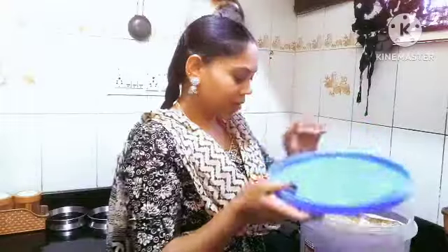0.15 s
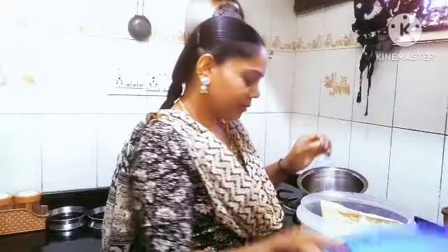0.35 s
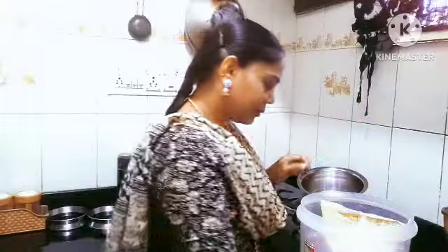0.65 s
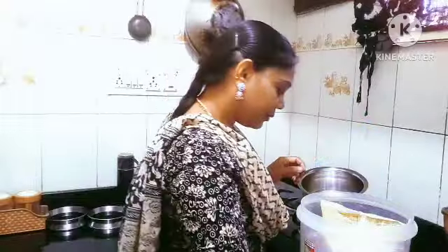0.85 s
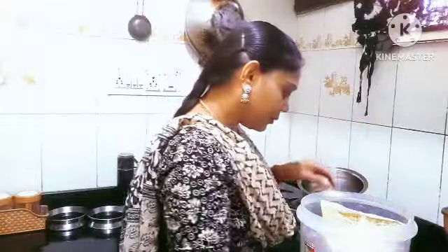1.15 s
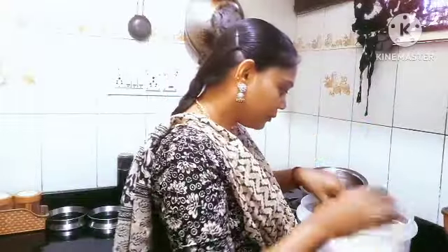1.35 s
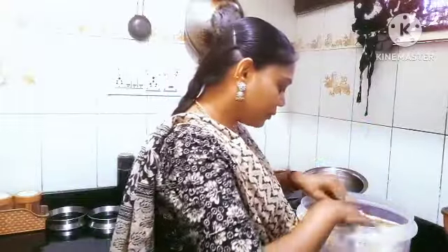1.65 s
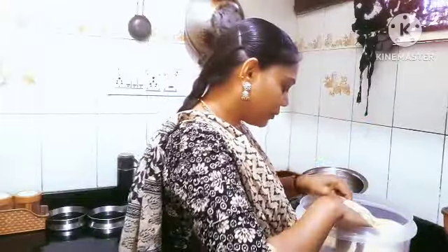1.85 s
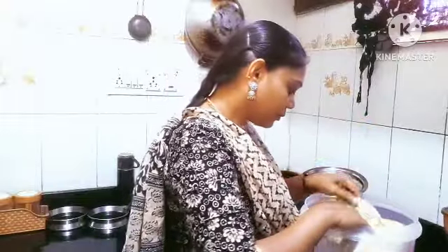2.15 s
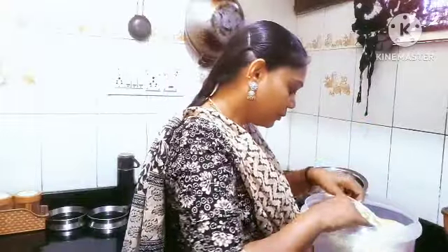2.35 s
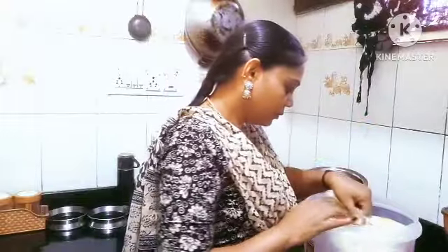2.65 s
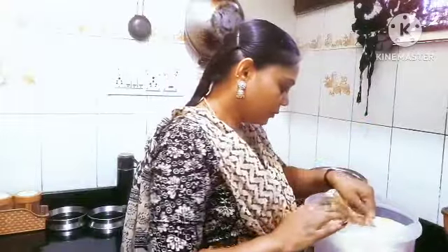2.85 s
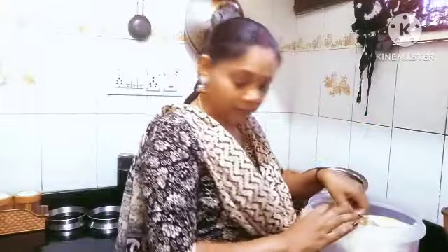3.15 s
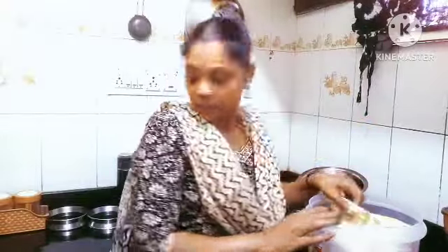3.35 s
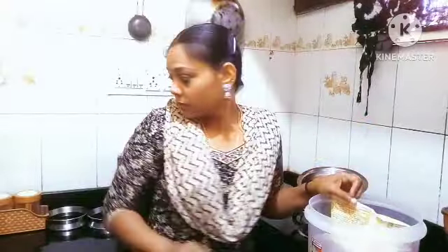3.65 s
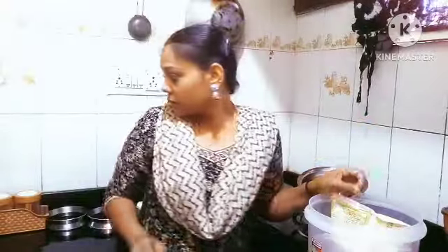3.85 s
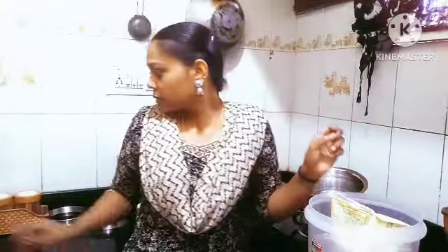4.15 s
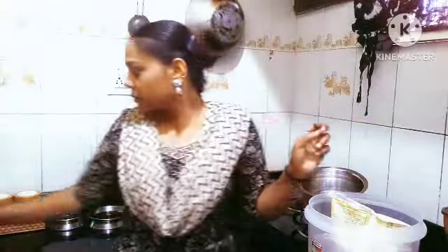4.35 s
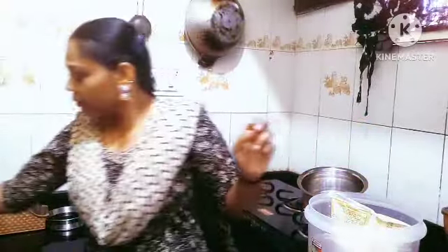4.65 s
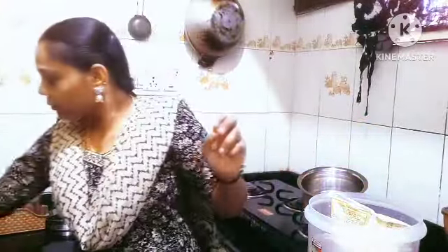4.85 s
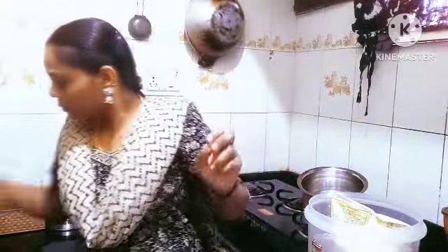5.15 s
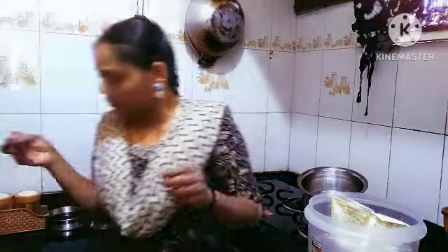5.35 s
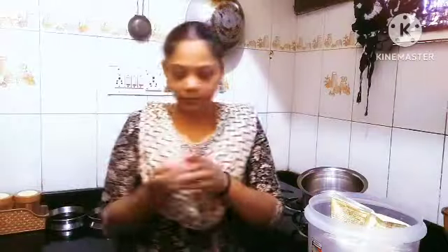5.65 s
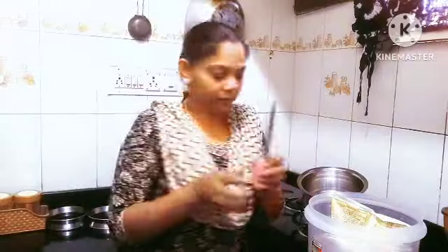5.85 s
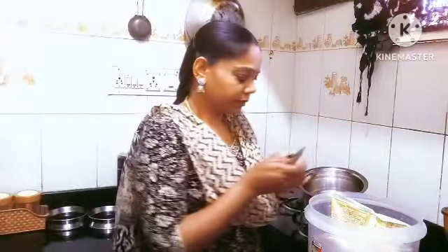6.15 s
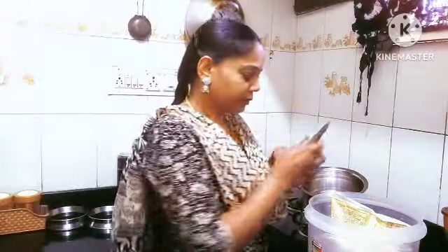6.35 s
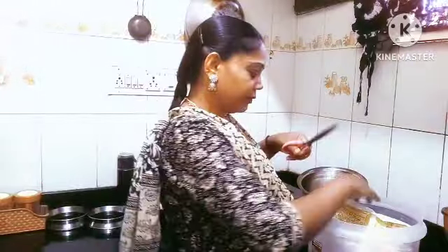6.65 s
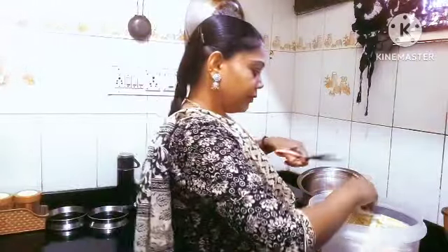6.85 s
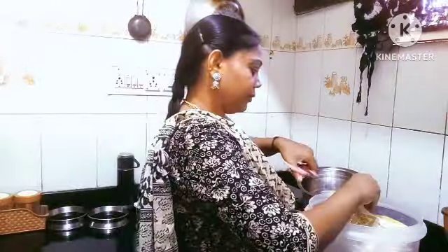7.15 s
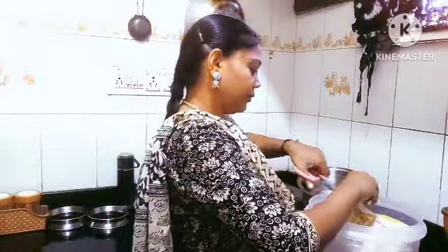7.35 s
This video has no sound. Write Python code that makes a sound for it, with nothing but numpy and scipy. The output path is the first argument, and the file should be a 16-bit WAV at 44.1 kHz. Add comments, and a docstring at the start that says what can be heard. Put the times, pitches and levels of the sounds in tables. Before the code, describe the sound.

Dull tub bump, ringing bowl knocks, busy crackling of a plastic bag, a quiet gap, a knife's scrape and clatter, then more bag rustling over faint hum.

```python
"""Getting flour ready

In a small tiled kitchen a lid is put aside and a steel bowl is set down on the stone counter; hands dig at
a plastic flour bag in a plastic tub, a knife is picked up and the bag is handled again.
Knocks and snaps are short noise bursts, and hard things add dying tones. Rubbing is made of many tiny slips.
Faint pings sound later; a wavering mains hum, a low murmur of air and brushing clothes lie underneath.
"""
import sys
import numpy as np
from scipy import signal
from scipy.fft import rfft, irfft, next_fast_len
from scipy.io import wavfile

SR = 44100
rng = np.random.default_rng(int(sys.argv[2]) if len(sys.argv) > 2 else 0)


def digitize_waveform(pressure):
    """Quantize a signal to 16-bit integers and store it at the path in sys.argv[1].

    Rows of a 2-D input are taken as channels; values are limited to [-1, 1].
    """
    field = np.atleast_2d(pressure).T
    bounded = np.clip(field, -1, 1)
    quanta = np.round(bounded * 32767).astype(np.int16)
    wavfile.write(sys.argv[1], SR, quanta)


N = 331632
TIME = np.arange(N) / SR
SHORT_TIME = TIME[:SR // 2]   # the half second given to each knock or echo

# Levels in the tables are relative: each sound is scaled again where it is used.
# Room air: [f/Hz, level/dB per Hz]
AIR_COLOUR = [(15, -58.5), (25, -14), (92, -0.5), (170, -6), (200, -16.5), (229, -10.5), (309, -14),
              (354, -20), (451, -20.5), (796, -22), (1040, -22), (4250, -49), (7110, -60), (8140, -55),
              (16000, -41)]
# Steady hum tones: [f/Hz, level/dB, pitch waver as a share of f]
HUM_TONES = [(94.6, -65, 0.014), (201.8, -61.5, 0.0027), (300, -88.5, 0.031), (2144, -83, 0.044)]
# Sleeves and clothes brushing as the arms move: [t/s, length/s, level/dB]
CLOTH_BRUSHES = [(0.195, 0.062, -61), (0.42, 0.14, -78.5), (4.1, 0.022, -71.5), (4.55, 0.047, -77),
                 (5.53, .015, -78), (5.85, 0.12, -75), (6.15, .15, -76), (6.55, 0.054, -76.5)]

# The tub being bumped, dull on its wall and thin on its rim: [t/s, level/dB, low cut f/Hz, high cut f/Hz]
TUB_KNOCKS = [(0.163, -39.5, 129, 9000), (0.224, -49, 150, 600), (0.235, -44, 453, 7000),
              (1.400, -53.5, 179, 250), (1.512, -42.5, 260, 600), (2.355, -23, 89.4, 109),
              (2.397, -37.5, 60, 150), (3.138, -61, 804, 1200), (3.238, -50, 300, 2010),
              (3.816, -40.5, 283, 1410), (3.893, -47.5, 870, 1600), (7.04, -42, 220, 300),
              (7.176, -62, 390, 1300), (7.369, -32, 590, 254), (7.371, -32.5, 69.4, 78.6),
              (7.395, -37.5, 600, 300), (7.48, -44, 217, 700)]
# Noise of a contact with the tub: [f/Hz, level/dB per Hz]
TUB_CONTACT_COLOUR = [(20, -65), (50, -11), (90, -14.5), (300, 12), (470, -14.5), (750, -4), (1200, -10.5),
                      (2500, -17.5), (5000, -23.5), (8500, -36), (11500, -23.5), (16000, -31.5)]
# Tones of the tub: [f/Hz, level/dB, time to fall 60 dB/s]
TUB_TONES = [(124, -10, .17), (275, -3, .1), (300, 0, .15), (565, -15, .14), (614, -10, .15),
             (673, -11, .18), (72, -15, .2), (870, -7, .15), (946, -6, .15)]

# The bowl landing and rocking on the counter: [t/s, level/dB, low cut f/Hz, high cut f/Hz]
BOWL_KNOCKS = [(0.9055, -36, 4140, 3900), (0.906, -30, 60, 7000), (0.921, -35, 910, 2500),
               (0.944, -35, 49.8, 2500), (0.966, -36, 60, 3480), (1.057, -31.5, 50, 2300),
               (1.090, -32, 400, 7050), (1.098, -28.5, 350, 400), (1.104, -36.5, 60, 1200)]
# Noise of a contact with the bowl: [f/Hz, level/dB per Hz]
BOWL_CONTACT_COLOUR = [(25, -28), (70, 2), (175, -13.5), (313, -7), (483, -13.5), (746, -2), (1180, -1),
                       (1660, -14), (1950, -11), (2750, -18), (3400, -23.5), (4300, -25.5), (6000, -30.5),
                       (8500, -41), (12000, -30.5), (16000, -33.5)]
# Tones of the bowl: [f/Hz, level/dB, time to fall 60 dB/s]
BOWL_TONES = [(733, 0, .24), (780, -1, .2), (864, -5, .24), (912, -4, .24), (318, -18, .3), (1152, -8, .26),
              (1184, -8, .2), (1291, -11, .24), (1395, -12, .24), (1950, -16, .26), (2418, -21, .22),
              (3214, -22, .18), (4250, -22, .1)]

# Hand strokes on the bag: [t/s, length/s, scrape level/dB, crinkle against scrape/dB, tub boom against scrape/dB]
BAG_STROKES = [(1.52, 0.083, -46, -8, -14), (1.626, 0.047, -36, -3.5, -4.5), (1.819, 0.02, -48, -3.5, 3),
               (1.949, 0.051, -38.5, -5.5, -4.5), (1.995, 0.092, -42, -16.5, -2),
               (2.299, 0.11, -47.5, -10.5, -10), (2.474, 0.017, -49, -12, -0.5),
               (2.557, 0.005, -41.5, -19, -23), (2.656, 0.071, -43.5, -13.5, -5.5),
               (2.76, 0.092, -40, -8, -11), (2.99, 0.045, -58, -11, 2.5), (3.252, 0.048, -53.5, -7, 3.5),
               (3.326, .15, -45.5, -0.5, -6), (3.532, 0.078, -40.5, -7.5, -0.5), (3.733, 0.013, -52, 3, -8),
               (3.822, 0.031, -52.5, -10, 2), (6.937, 0.046, -41.5, -13.5, -6),
               (6.996, 0.073, -36.5, -2, -2.5), (7.169, 0.019, -50.5, -5.5, 5),
               (7.28, 0.035, -53.5, -11, 3), (7.454, 0.024, -48, -13, 7.5)]
# Scraping over the bag in the tub: [f/Hz, level/dB per Hz]
SCRAPE_COLOUR = [(90, -45), (220, -6.5), (300, 12.5), (380, -3.5), (540, -14), (720, 2.5), (960, 0.5),
                 (1200, -8), (1560, 0.5), (2100, -7), (3200, -12.5), (4500, -15.5), (7000, -23.5),
                 (16000, -37)]
# Crinkling film, also used for the brush of cloth: [f/Hz, level/dB per Hz]
CRINKLE_COLOUR = [(900, -34), (2500, 5), (4400, -3), (5600, -12.5), (7000, 1), (9000, -10.5), (10300, 5.5),
                  (11600, 11), (13200, -1), (14700, -2), (16000, 6.5)]
# Creases of the bag snapping over: [t/s, level/dB, low cut f/Hz, high cut f/Hz]
CREASE_SNAPS = [(1.519, -47.5, 300, 6960), (1.565, -41, 1800, 5500), (1.632, -34.5, 4000, 16000),
                (1.770, -43, 690, 14300), (1.817, -53, 667, 1970), (1.939, -45, 603, 8000),
                (2.212, -47, 700, 8900), (2.357, -42, 700, 1500), (2.559, -40.5, 600, 11600),
                (2.700, -39.5, 715, 14000), (2.821, -42.5, 2000, 16000), (2.868, -42.5, 1970, 16000),
                (2.960, -51, 600, 6000), (3.399, -38, 950, 8700), (3.458, -38, 1430, 16000),
                (3.547, -42.5, 900, 12000), (3.596, -39.5, 1190, 15000), (3.723, -42, 1600, 12000),
                (3.818, -48, 1490, 12200), (3.894, -57, 900, 9380), (6.924, -45, 1390, 2600),
                (6.989, -48, 1500, 5000), (7.045, -56, 3000, 14000), (7.305, -48, 1710, 13100),
                (7.464, -53, 1000, 8050)]
# Noise of a snapping crease: [f/Hz, level/dB per Hz]
SNAP_COLOUR = [(150, 18), (300, 8.5), (520, -25.5), (950, 24), (1250, 6), (2000, 15.5), (3300, 4),
               (4400, 5.5), (5600, -1), (7000, 0), (9000, -2.5), (11600, 13), (13200, 1), (15500, 0.5)]

# Faint high pings: [t/s, level/dB, f/Hz]
HIGH_PINGS = [(4.529, -66, 7940), (4.589, -78, 8150), (4.59, -83, 6130), (5.775, -83.5, 7880),
              (6.188, -81, 8100), (6.228, -81, 5970)]

# The knife sliding out before it clatters: [t/s, length/s, level/dB]
KNIFE_SLIDES = [(5.081, .1, -48.5)]
# Noise of the dragging blade: [f/Hz, level/dB per Hz]
SLIDE_COLOUR = [(150, -17), (400, 0), (600, -0.5), (1100, 4.5), (1600, -4), (2600, -17), (4400, -21.5),
                (6000, -32), (12000, -22), (16000, -25)]
# The knife clattering against steelware: [t/s, level/dB, low cut f/Hz, high cut f/Hz]
KNIFE_KNOCKS = [(5.171, -45, 5080, 15000), (5.189, -28.5, 300, 10000), (5.212, -41.5, 400, 7000)]
# Noise of a contact with the knife: [f/Hz, level/dB per Hz]
KNIFE_CONTACT_COLOUR = [(88, -89), (150, -73.5), (226, -35), (328, -24), (439, -24), (578, -28), (624, -36),
                        (854, -5.5), (1060, -16.5), (1690, -18), (2300, -22.5), (5150, -38), (8560, -41),
                        (11700, -26), (16000, -46)]
# Tones of the knife: [f/Hz, level/dB, time to fall 60 dB/s]
KNIFE_TONES = [(857, 0, .24), (904, -3, .22), (948, -5, .28), (6691, -27, .2), (334, -18, .18),
               (1319, -15, .22), (1600, -12, .33), (1712, -11.5, .3), (3488, -25, .2), (4382, -26, .18)]

# How long the room's echoes last: [f/Hz, time to fall 60 dB/s]
ROOM_DECAY = [(100, 0.58), (260, 0.2), (700, 0.24), (1840, 0.19), (4850, 0.3), (12800, 0.21)]
# The right port (listening opening) against the left: [f/Hz, level/dB]
RIGHT_PORT = [(100, 1), (200, -2), (400, 2.5), (700, 1), (1300, 1.5), (2400, -.5), (4400, -8.5),
              (8100, -16.5), (15000, -15)]

PORT_GAP_S, LEFT_LEAD_S = 0.00068, 0.00024   # sound's travel time between ports; left's head start


def from_db(db):
    """Turn decibels into a gain."""
    return 10 ** (np.asarray(db) / 20)


def rms_one(x):
    """Scale so that the average of the channels has rms 1."""
    middle = np.atleast_2d(x).mean(axis=0)
    return x / np.sqrt(np.mean(middle ** 2) + 1e-20)


def at_hz(points, hz):
    """Read a table between its points, with frequency spaced as pitch is heard."""
    f, value = np.transpose(points)
    return np.interp(np.log(np.maximum(hz, 1)), np.log(f), value)


def bins(size):
    """List the frequencies (Hz) of a real Fourier transform."""
    return np.fft.rfftfreq(size, 1 / SR)


def coloured(x, colour):
    """Shape a sound's spectrum with a filter that never acts early (minimum phase)."""
    size = 2 * next_fast_len(x.shape[-1] // 2 + 2048)
    cepstrum = irfft(np.log(from_db(at_hz(colour, bins(size)))))
    # folding the second half onto the first keeps the response from starting early
    cepstrum[1:size // 2] *= 2
    cepstrum[size // 2 + 1:] = 0
    return irfft(rfft(x, size) * np.exp(rfft(cepstrum)))[..., :x.shape[-1]]


def drift(rate_hz, size=N):
    """Make a slow random wander with rms 1."""
    padded = next_fast_len(size, True)
    smoothing = 1 + (bins(padded) / rate_hz) ** 2
    wander = irfft(rfft(rng.standard_normal(padded)) / smoothing, padded)
    return rms_one(wander[:size])


def diffuse(size):
    """Noise arriving from all sides: the two ports agree in the bass and become unrelated above."""
    alike = 0.93 * np.sinc(2 * bins(size) * PORT_GAP_S)
    mid, side = rfft(rng.standard_normal((2, size)))
    side = side * np.sqrt((1 - alike) / (1 + alike))
    return irfft(mid + side * [[1], [-1]], size)


def kitchen(x, direct_db):
    """The straight path reaches the left port first; dense tile reflections die away band by band."""
    size, hz = len(SHORT_TIME), bins(len(SHORT_TIME))
    field = rfft(diffuse(size))
    centres = np.geomspace(100, 12800, 8)
    tail = 0
    for centre, share in zip(centres, np.eye(len(centres))):
        band = irfft(field * at_hz(np.c_[centres, share], hz), size)
        tail = tail + band * from_db(-60 * SHORT_TIME / at_hz(ROOM_DECAY, centre))
    build_up = 1 - np.exp(-SHORT_TIME / 0.0017)
    response = rms_one(tail * build_up) / np.sqrt(size)
    response[[0, 1], [0, round(LEFT_LEAD_S * SR)]] += from_db(direct_db)
    return signal.fftconvolve(x[None], response, axes=1)[:, :len(x)]


def add(out, s, sound):
    """Mix a sound in at time s (seconds)."""
    at = round(s * SR)
    out[:, at:at + sound.shape[1]] += sound[:, :N - at]


def gestures(rows, attack_s, fall_db_per_s, swell_db=0):
    """Gain of rubbing movements: each fades in before its start, swells while it lasts, then dies away."""
    power = np.zeros((1, N))
    age = TIME[:SR] - attack_s
    for start, length, db in rows:
        pressure_db = swell_db * (np.clip(age / length, 0, 1) - 0.5)
        release_db = fall_db_per_s * np.maximum(age - length, 0)
        fade_in = np.clip(1 + age / attack_s, 0, 1)
        gain = fade_in * from_db(db + pressure_db - release_db)
        add(power, start - attack_s, gain[None] ** 2)
    return np.sqrt(power[0])


def ringing(tones, width, build_s=0.0016):
    """Dying sines that build up as the contact spreads; each reaches the right port by its own delay."""
    out = 0
    for k, (hz, db, t60) in enumerate(tones):
        lag_s = PORT_GAP_S * width * rng.uniform(0.0095, 1)
        age = np.maximum(SHORT_TIME - [[0], [lag_s]], 0)
        gain = from_db(db + rng.normal(0, 1.5) - 60 * age / t60)
        out = out + (-1) ** k * gain * np.sin(2 * np.pi * hz * age)
    return rms_one(out * (1 - np.exp(-SHORT_TIME / build_s)))


def blows(table, colour, burst_t60, direct_db, level_db, tones=(), ring_db=0, width=1):
    """Each contact is a short burst of noise, plus the body's own tones if it has any."""
    out = np.zeros((2, N))
    burst_fade = from_db(-60 * SHORT_TIME / burst_t60)
    for s, db, low_hz, high_hz in table:
        burst = coloured(rng.standard_normal(len(SHORT_TIME)) * burst_fade, colour)
        sound = rms_one(kitchen(burst, direct_db))
        if len(tones):
            sound = sound + from_db(ring_db) * ringing(tones, width)
        # a stiff spot gives little bass, a soft contact little treble
        bass_cut = signal.butter(2, low_hz, "high", fs=SR, output="sos")
        sound = signal.sosfilt(bass_cut, sound)
        pole = np.exp(-2 * np.pi * high_hz / SR)
        sound = signal.lfilter([1 - pole], [1, -pole], sound)
        add(out, s, from_db(db + level_db) * rms_one(sound))
    return out


def grains(per_s, spread_db, clump_db):
    """Tiny slips and buckles of uneven size, coming in clumps."""
    draw = rng.random(N)
    chance = per_s * from_db(clump_db * drift(40)) / SR
    size = from_db(spread_db * np.minimum(rng.exponential(1, N), 4))
    return (draw < chance) * size * rng.choice([-1, 1], N)


def rubbed(slips, colour, direct_db, count=4):
    """Share slips among several spots, each with its own echoes; the result has rms 1."""
    spot = rng.integers(0, count, N)
    echoed = sum(kitchen(slips * (spot == k), direct_db) for k in range(count))
    return rms_one(coloured(echoed, colour))


def room_air():
    """The murmur of air is steady noise arriving from all sides."""
    return from_db(-58.5) * rms_one(coloured(diffuse(N), AIR_COLOUR))


def mains_hum():
    """A few sine tones whose pitch and level waver."""
    out = 0
    for hz, db, waver in HUM_TONES:
        gain = from_db(db + 1.3 * drift(7.4))
        pitch = hz * (1 + waver * drift(hz / 10))
        out = out + gain * rms_one(np.sin(2 * np.pi * np.cumsum(pitch) / SR))
    return out


def brushing_clothes():
    """Cloth rubbing on itself is smooth noise that comes and goes with the arms."""
    movement = gestures(CLOTH_BRUSHES, attack_s=0.054, fall_db_per_s=127)
    return movement * rms_one(coloured(diffuse(N), CRINKLE_COLOUR))


def tub_knocks():
    """A bump on the plastic tub gives a short noise and quickly dying low tones."""
    return blows(TUB_KNOCKS, TUB_CONTACT_COLOUR, burst_t60=0.015, direct_db=-1.5, level_db=-13.5,
                 tones=TUB_TONES, ring_db=-1.5, width=1.0)


def bowl_knocks():
    """The steel bowl hits the stone with a very short crack and rings."""
    return blows(BOWL_KNOCKS, BOWL_CONTACT_COLOUR, burst_t60=0.006, direct_db=0.5, level_db=-13.0,
                 tones=BOWL_TONES, ring_db=-2.5, width=0.85)


def bag_handling():
    """Fingers scrape the flour bag, its thin film crinkles, and the tub's hollow booms along."""
    start, length, scrape_db, crinkle_db, boom_db = np.transpose(BAG_STROKES)
    rubbing = rubbed(grains(per_s=600, spread_db=6, clump_db=4), SCRAPE_COLOUR, direct_db=-7.5)
    crinkle = rubbed(grains(per_s=310, spread_db=3.5, clump_db=2), CRINKLE_COLOUR, direct_db=-2.5)
    hollow_edge_hz = 400   # the tub's boom lies below this
    boom = signal.sosfilt(signal.butter(5, hollow_edge_hz, "low", fs=SR, output="sos"), rubbing)
    scrape = signal.sosfilt(signal.butter(5, hollow_edge_hz, "high", fs=SR, output="sos"), rubbing)
    layers = [(scrape, scrape_db, 182), (boom, scrape_db + boom_db, 182),
              (crinkle, scrape_db + crinkle_db, 195)]
    out = 0
    for sound, level_db, fall_db_per_s in layers:
        # a stroke bites quickly, presses harder as it goes and then dies away
        strokes = zip(start, length, level_db)
        out = out + sound * gestures(strokes, 0.025, fall_db_per_s, swell_db=1.5)
    return out


def crease_snaps():
    """A crease of the film flips over with a short burst of noise and no tone of its own."""
    return blows(CREASE_SNAPS, SNAP_COLOUR, burst_t60=0.021, direct_db=2, level_db=-15.0)


def high_pings(t60=0.11, level_db=-12):
    """Small thin tones of unsteady pitch that ring briefly in the room."""
    out = np.zeros((2, N))
    for s, db, hz in HIGH_PINGS:
        pitch = hz * (1 + 0.031 * drift(300, size=len(SHORT_TIME)))
        tone = np.sin(2 * np.pi * np.cumsum(pitch) / SR)
        fading = tone * from_db(-60 * SHORT_TIME / t60)
        add(out, s, from_db(db + level_db) * rms_one(kitchen(fading, direct_db=4.0)))
    return out


def knife_slide():
    """The blade drags roughly, in many tiny slips, as it is pulled out."""
    drag = gestures(KNIFE_SLIDES, attack_s=0.016, fall_db_per_s=494, swell_db=1.5)
    slips = grains(per_s=2500, spread_db=9, clump_db=9)
    return drag * rubbed(slips, SLIDE_COLOUR, direct_db=-7.5, count=1)


def knife_knocks():
    """The knife clatters on steelware with a longer noise and ringing tones."""
    return blows(KNIFE_KNOCKS, KNIFE_CONTACT_COLOUR, burst_t60=0.044, direct_db=-6, level_db=-12.0,
                 tones=KNIFE_TONES, ring_db=-3, width=0.86)


def scene():
    """Add up everything handled on the counter and the quiet background."""
    bowl_and_tub = bowl_knocks() + tub_knocks()
    knife = knife_knocks() + knife_slide()
    bag = crease_snaps() + bag_handling()
    pings = high_pings()
    background = room_air() + mains_hum() + brushing_clothes()
    return bowl_and_tub + knife + bag + pings + background


def record(dry):
    """The right port is shaded and hears little treble; the very top is cut in both."""
    right = from_db(at_hz(RIGHT_PORT, bins(N)))
    # keep the power of the two ports together unchanged
    ports = np.array([np.ones_like(right), right]) * np.sqrt(2 / (1 + right ** 2))
    heard = irfft(rfft(dry) * ports, N)
    top_cut = signal.ellip(10, 0.3, 70, 15650, fs=SR, output="sos")   # cut at 15650 Hz
    return signal.sosfilt(top_cut, heard)


dry = scene()
out = record(dry)
digitize_waveform(out)
```